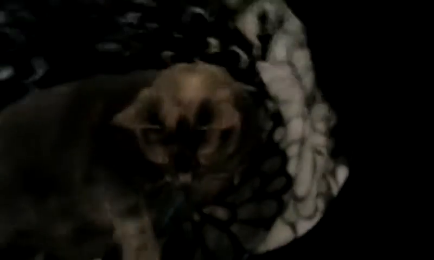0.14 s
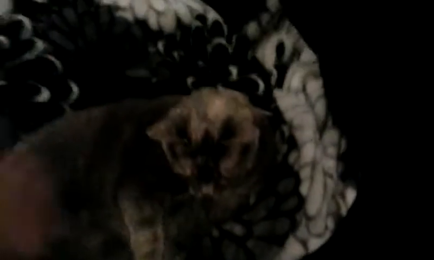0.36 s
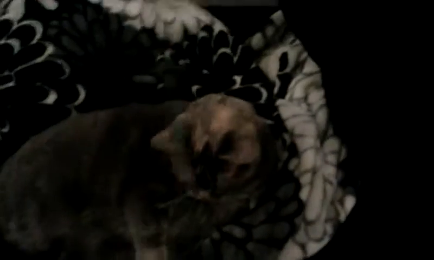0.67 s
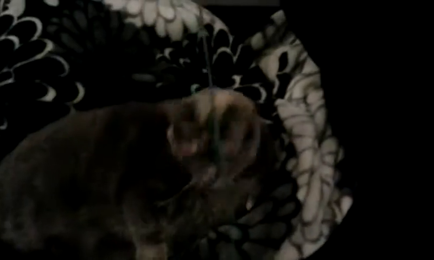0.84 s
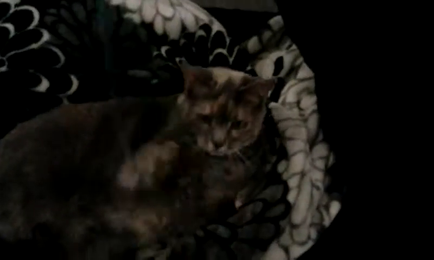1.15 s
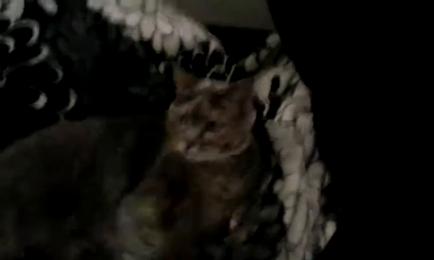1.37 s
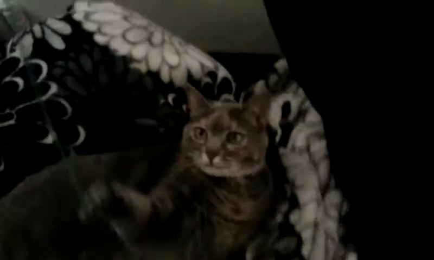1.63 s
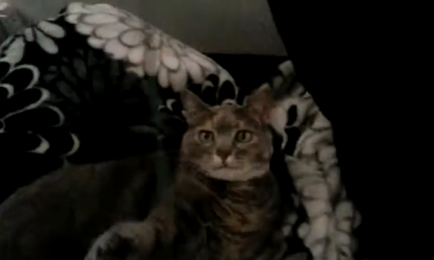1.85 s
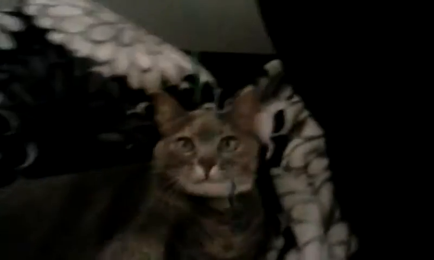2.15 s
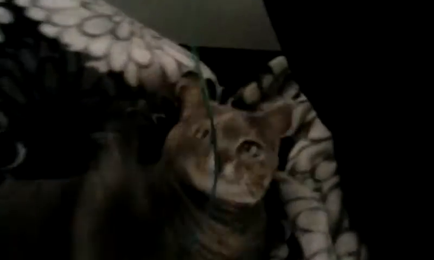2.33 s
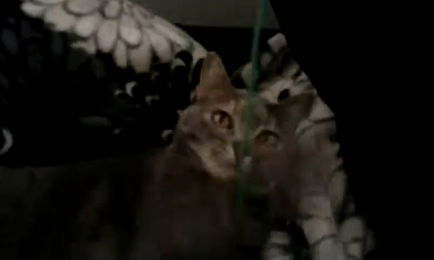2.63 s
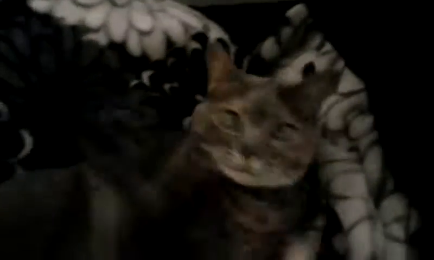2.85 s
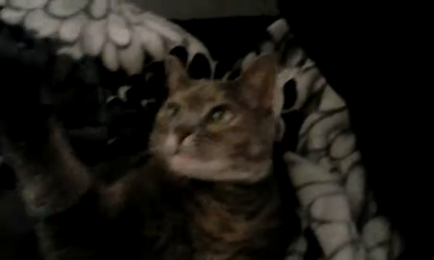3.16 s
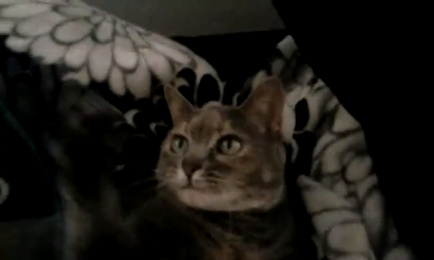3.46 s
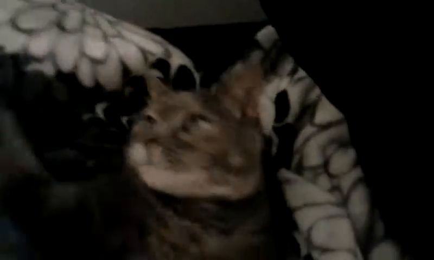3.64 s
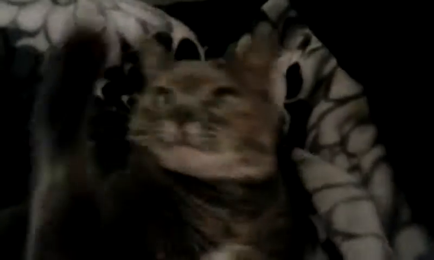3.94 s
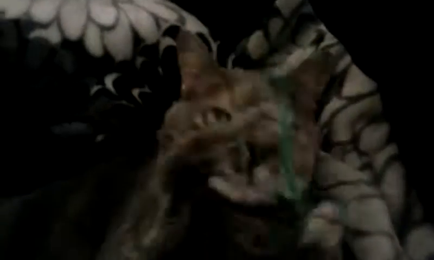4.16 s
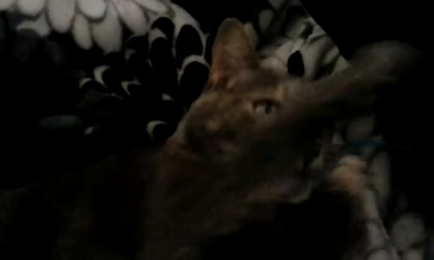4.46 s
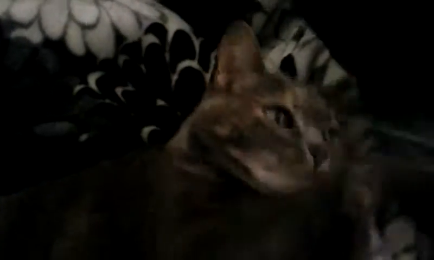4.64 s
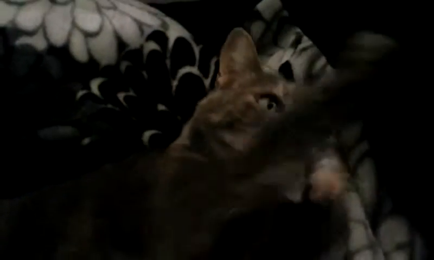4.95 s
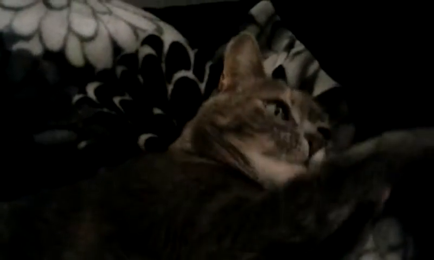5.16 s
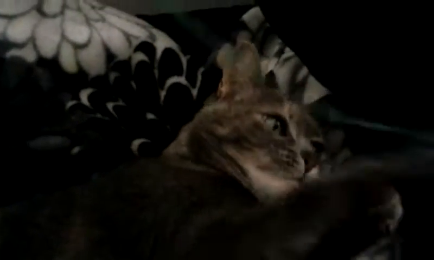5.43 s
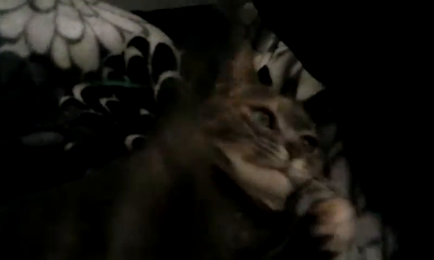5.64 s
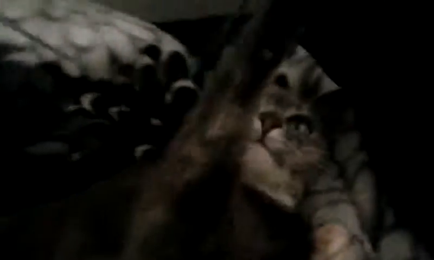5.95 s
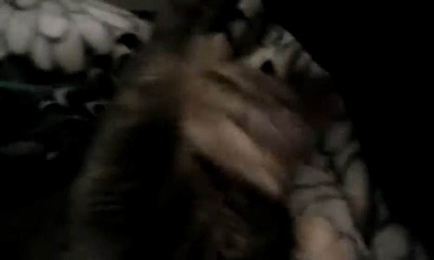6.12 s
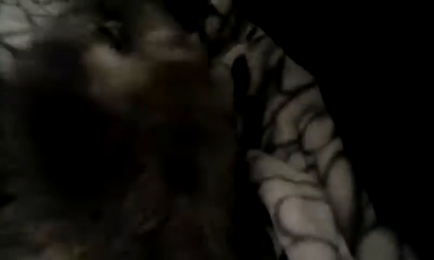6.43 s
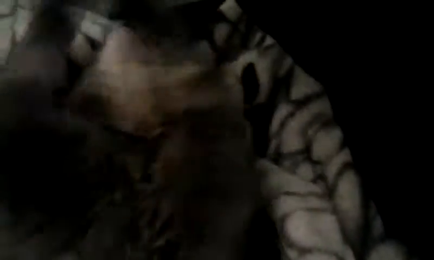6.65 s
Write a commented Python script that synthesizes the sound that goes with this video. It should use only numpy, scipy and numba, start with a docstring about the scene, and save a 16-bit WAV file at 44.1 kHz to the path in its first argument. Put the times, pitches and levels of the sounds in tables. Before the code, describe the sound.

A soft, bright rustle of fur and blanket opens the sound, close to the microphone, and eases after about 0.7 seconds. Low handling rumble and faint room air continue underneath, with everything dipping briefly now and then. From 1.5 to 2.2 seconds the rustle grows again and a cat's claws make a run of sharp, high clicks, with a dull paw thump on the mattress at 1.6 seconds. Softer pats follow around 3 and 4 seconds. From about 3.9 to 5.8 seconds a string slides over the cloth with a thin, uneven hiss, dotted with light ticks, a muffled pat and a clearer click at 5 seconds. Near 5.8 seconds comes a soft thud and a quick cluster of loud claw snaps. Weaker rustling and a tiny tick carry on until about 6.8 seconds.

```python
"""Fur and cloth rustle brightly as a cat on a blanket bats at a string, close to a handheld camera.
Slipping fibres excite the resonance of the microphone port, and the hand's tremor rumbles in the case
over the faint air of a quiet room. Claws tick, paws thud on the mattress, and later the string hisses
as it is drawn over the cloth. Now and then the rustle, rumble and room noise dip for a moment."""
import sys
import numpy as np
from scipy import signal
from scipy.fft import rfft, irfft
from scipy.io import wavfile
from scipy.ndimage import uniform_filter1d
from numba import njit

SR = 44100
rng = np.random.default_rng(int(sys.argv[2]) if len(sys.argv) > 2 else 0)


def pcm_store(signal):
    """Save signal as 16-bit PCM."""
    levels = np.round(np.clip(np.atleast_2d(signal), -1, 1) * 32767)
    wavfile.write(sys.argv[1], SR, levels.astype(np.int16).T)


N = 299439

# Cloth friction. Each row: time in seconds, then levels in dB of port band, top sheen and lower hiss.
RUSTLE_LEVELS = [(0.0, -46.5, -51, -53), (0.09, -50, -56, -57.5), (0.2, -48, -50.5, -52),
                 (0.36, -45, -47, -50), (0.55, -46.5, -52, -58.5), (0.72, -54, -55.5, -75),
                 (.84, -52.5, -52.5, -74), (.95, -56, -55, -81), (1.3, -55, -55, -80),
                 (1.52, -48.5, -54, -68), (1.72, -47, -53, -64), (1.93, -47.5, -65, -76),
                 (2.12, -43, -52, -60.5), (2.3, -47, -60, -67.5), (2.55, -54, -64, -79),
                 (2.76, -52.5, -58.5, -80), (2.785, -47.5, -63, -76), (2.82, -43.5, -53, -66),
                 (2.845, -47.5, -60, -68), (2.865, -51, -62, -73), (2.95, -55, -62, -80),
                 (3.07, -52.5, -64, -78), (3.12, -55.5, -65, -80), (3.2, -53, -62, -74),
                 (3.3, -56, -62.5, -76), (3.62, -57.5, -63.5, -69.5), (3.82, -54, -57.5, -74.5),
                 (4.05, -55, -58, -66.5), (4.4, -56, -60, -75), (4.6, -56, -57.5, -64),
                 (4.85, -56, -58, -75), (5.15, -53.5, -56.5, -74), (5.5, -56.5, -57.5, -72),
                 (5.72, -58.5, -61, -72), (5.84, -49, -53.5, -57.5), (6.1, -59, -64, -84),
                 (6.27, -57, -68, -71), (6.32, -60, -63, -73), (6.35, -56.5, -65, -66),
                 (6.385, -60, -64, -71), (6.405, -54.5, -63, -74), (6.44, -59.5, -69, -82),
                 (6.55, -63, -70, -72.5), (6.635, -60, -68, -78), (6.7, -60, -68, -86),
                 (6.79, -61, -65, -78)]
# The brightest band of the rustle. Each row: time in seconds, centre in Hz.
PORT_CENTRE = [(0, 8300), (.55, 8240), (1.0, 8700), (1.6, 7970), (2.0, 8100), (2.17, 7770), (2.4, 8240),
               (2.76, 8080), (3.0, 8230), (3.84, 8340), (4.4, 8230), (5.7, 8500), (5.82, 8100),
               (5.95, 8540), (6.2, 8760), (6.27, 7700), (6.35, 8450), (6.79, 8460)]
# Narrow ring of cloth dragged hard. Each row: time in seconds, centre in Hz, level in dB.
DRAG_RING = [(0, 7050, -46), (.08, 7040, -52), (.18, 7000, -52.5), (.3, 7060, -45.5), (.36, 6900, -55),
             (.47, 6800, -47.5), (.58, 6840, -57), (.7, 7000, -59), (.8, 7000, -100)]
# Tremor of the handled case. Each row: time in seconds, level in dB.
TREMOR_LEVELS = [(0.0, -62), (0.3, -70), (0.42, -58.5), (0.62, -63.5), (0.95, -73.5), (1.16, -71),
                 (1.23, -60), (1.29, -65), (1.42, -59), (1.54, -63), (1.62, -58), (1.75, -64.5),
                 (1.95, -57.5), (2.15, -62.5), (2.45, -61.5), (2.66, -61), (2.71, -56), (2.95, -65.5),
                 (3.06, -55), (3.12, -65), (3.19, -53.5), (3.25, -58.5), (3.42, -62), (3.52, -59),
                 (3.62, -66.5), (3.9, -57.5), (4.3, -60), (5.0, -56.5), (5.12, -63.5), (5.25, -61),
                 (5.55, -58.5), (5.72, -57), (5.78, -53.5), (5.92, -66), (6.2, -68.5), (6.3, -59.5),
                 (6.38, -56), (6.44, -71), (6.5, -68), (6.79, -68)]
# Firm grips on the case. Each row: start in seconds, hold in seconds, level in dB.
FIRM_GRIPS = [(0.0, 0.23, -75), (0.344, 0.28, -66.5), (1.37, 0.16, -73), (1.556, 0.12, -61.5),
              (2.78, 0.037, -77), (2.994, 0.052, -65), (3.971, 0.15, -63), (4.821, 0.054, -60.5),
              (5.647, 0.18, -61.5), (6.3, 0.054, -73)]
# Murmur of room air. Each row: time in seconds, level in dB.
AIR_LEVELS = [(0.72, -72.5), (0.95, -77), (1.32, -75), (1.6, -64), (1.92, -71.5), (2.2, -67.5),
              (2.7, -72.5), (3.1, -69.5), (3.7, -70.5), (4.0, -67), (4.4, -68.5), (4.8, -66), (5.5, -66),
              (5.77, -65.5), (5.82, -60.5), (5.9, -67), (6.12, -75), (6.3, -68), (6.5, -73.5),
              (6.79, -69.5)]
# Wavering bands in that murmur. Each row: centre in Hz, width in Hz, relative level in dB.
WAVERING_BANDS = [(1385, 460, -4.5), (2275, 540, -6), (2790, 480, -3.5)]
# Claw impacts. Each row: time in seconds, level in dB, ring in Hz, relative level of the edge in dB.
CLAW_TICKS = [(0.6382, -46, 2290, -17), (.639, -52, 3780, -16), (1.5019, -28.5, 8400, -6),
              (1.5075, -28, 9200, -4), (1.535, -29, 8900, -7), (1.5528, -33, 8470, -22),
              (1.5713, -30.5, 8030, -20), (1.5905, -46, 2980, -11), (1.5904, -23.5, 8500, -9),
              (1.6737, -21, 8800, -6), (1.7194, -15, 8530, -6), (2.0308, -21.5, 9300, -6),
              (2.0906, -28, 8400, -28), (2.1548, -11.5, 7630, -16), (2.1544, -13.5, 9700, -11),
              (2.1868, -30, 7300, -23), (2.2071, -28, 7760, -11), (3.5413, -33, 3150, -2),
              (3.5428, -35.5, 4550, -31), (4.232, -42, 7000, -15), (4.2664, -35, 9300, -2),
              (4.4553, -28.5, 6200, -2), (4.545, -34, 8700, -17.5), (4.59, -38, 4950, -11),
              (5.0001, -22, 7800, -9), (5.105, -42, 9500, -8), (5.785, -36, 6860, -25),
              (5.8144, -10, 7900, 1), (5.821, -22, 8300, -1), (5.822, -25, 8100, -3.5),
              (5.8228, -18.5, 8300, -1), (5.856, -36, 8500, -6), (5.858, -47, 2550, -10),
              (5.8604, -23, 8700, 2.5), (5.8645, -36, 7500, -5), (5.8914, -21, 8600, -2),
              (6.2449, -39, 6200, -12), (6.2451, -43, 8550, -16), (6.352, -60, 4800, -19)]
# Brief dips in level. Each row: time of the lowest point in seconds, depth in dB, fall in seconds.
LEVEL_DIPS = [(.975, 10, 0.007), (1.02, 9, .008), (1.056, 16, 0.025), (1.281, 7, 0.012), (1.325, 14, 0.025),
              (1.372, 21, 0.023), (1.409, 11.5, 0.017), (2.539, 11, 0.018), (3.25, 7.5, 0.0089),
              (3.287, 8, 0.024), (3.38, 8, 0.007), (3.442, 13, 0.041), (3.492, 23, 0.027),
              (3.766, 10.5, 0.013), (4.295, 10, 0.019), (4.373, 10.5, 0.017), (4.428, 9, 0.013),
              (5.479, 10.5, 0.0094), (5.602, 11.5, 0.0049), (5.737, 6, 0.011), (6.048, 15, 0.0036),
              (6.225, 20, 0.022), (6.393, 10, 0.0062), (6.437, 6.5, 0.013), (6.608, 18, 0.017),
              (6.701, 7, 0.051), (6.746, 16, 0.018)]
# Paw impacts. Each row: start in seconds, level in dB, ring in Hz, rise in seconds,
# relative level of the knock in dB, snap in Hz, rise of the snap in seconds.
PAW_THUDS = [(1.59, -21.5, 144, 0.002, -26, 1580, 0.0003), (1.6431, -30, 150, 0.0033, -30, 1370, .0005),
             (2.988, -50, 174, 0.0036, -37, 900, .0008), (3.026, -42.5, 166, 0.0021, -22, 1200, 0.0013),
             (3.051, -56, 159, 0.0046, -22, 1190, 0.0041), (3.08, -47, 172, 0.0038, -35, 900, 0.00091),
             (3.985, -42, 136, 0.0067, -43, 900, .0008), (4.049, -51, 168.7, 0.017, -29, 900, .0008),
             (4.84, -47.5, 143, 0.008, -20, 546, 0.0011), (5.757, -42.5, 112.5, 0.011, -42, 900, .0008)]
# String drawn over cloth. Each row: time in seconds, then levels in dB of the low and the high band.
STRING_LEVELS = [(3.895, -100, -100), (3.912, -62, -52), (3.96, -61, -56), (3.975, -79, -63),
                 (3.99, -62, -55), (4.12, -59.5, -56), (4.25, -61, -52.5), (4.35, -61.5, -55),
                 (4.38, -75, -63), (4.44, -73, -56), (4.465, -59, -54.5), (4.5, -78, -54), (4.57, -79, -60),
                 (4.6, -67, -60), (4.7, -59, -51), (4.82, -64.5, -54.5), (4.88, -67.5, -54),
                 (4.95, -61.5, -53), (5.1, -60.5, -51), (5.22, -64, -55), (5.33, -62, -53.5),
                 (5.43, -65.5, -56), (5.55, -69, -57), (5.68, -66.5, -58.5), (5.78, -67, -71),
                 (5.83, -100, -100)]

# Spectra of the noises. Each row: frequency in Hz, relative spectral density in dB.
SHEEN_SPECTRUM = [(5880, -16), (10000, -13), (11000, -12.5), (11900, -2), (12700, -4.5), (14100, -9),
                  (15100, -8), (15900, -13.5)]
TREMOR_SPECTRUM = [(12, -46), (22, -43), (33, -15.5), (57, -3.5), (107, 2.5), (161, -8.5), (234, -26),
                   (259, -52), (300, -28), (390, -79), (660, -120)]
GRIP_SPECTRUM = [(100, -35), (170, -0.5), (220, -5.5), (290, -21), (441, -16.5), (492, -22.5), (605, -24),
                 (800, -33), (1040, -66), (1760, -120)]
AIR_SPECTRUM = [(150, -18), (250, -8), (334, -21), (447, -29), (678, -16), (807, -32), (938, -25),
                (1180, -8), (1420, -1.5), (2210, -3), (2890, -8.5), (3650, -5.5), (4000, -9.5), (5200, -66),
                (8800, -120)]
HUSH_SPECTRUM = [(200, -20), (330, -0.5), (520, -4.5), (800, -4.5), (1100, -1), (1600, -38)]
HISS_SPECTRUM = [(2500, -40), (3500, -14), (5500, -13.5), (7000, -0.5), (8500, -14), (10500, -7.5),
                 (13000, -5), (15700, -12.5), (16000, -43)]

RUSTLE_LOWPASS_HZ, CAMERA_TOP_HZ = 15950, 16990
TIME = np.arange(N) / SR


def undb(db):
    """Amplitude grows tenfold for every 20 dB."""
    return 10 ** (np.asarray(db) / 20)


def unit(x):
    """Normalisation to an rms of 1."""
    return x / np.sqrt(np.mean(x ** 2))


def curves(table):
    """Linear interpolation in time gives one curve for each column after the first."""
    times, *columns = np.transpose(table)
    return [np.interp(TIME, times, column) for column in columns]


def butter(x, order, hz, kind):
    """A Butterworth filter has a maximally flat passband."""
    return signal.sosfilt(signal.butter(order, hz, kind, fs=SR, output="sos"), x)


def cut_top(x, hz, order=10, ripple_db=.2, stop_db=60):
    """An elliptic low-pass trades ripple for a steep edge."""
    return signal.sosfilt(signal.ellip(order, ripple_db, stop_db, hz, fs=SR, output="sos"), x)


@njit
def resonator(x, hz, width_hz):
    """Two integrators in a loop form a band-pass with gain 1 at its moving centre."""
    y, band_state, low_state = np.empty(len(x)), 0., 0.
    for i in range(len(x)):
        gain, damping = np.tan(np.pi * hz[i] / SR), width_hz / hz[i]
        swing = (band_state + gain * (x[i] - low_state)) / (1 + gain * (gain + damping))
        band_state = 2 * swing - band_state
        low_state += 2 * gain * swing
        y[i] = damping * swing
    return y


def band(x, hz, width_hz):
    """Two resonators in cascade steepen the skirts of a band; rms 1."""
    hz, width_hz = hz * np.ones(N), float(width_hz)
    return unit(resonator(resonator(x, hz, width_hz), hz, width_hz))


def coloured(x, spectrum):
    """Weighting each frequency imposes a spectrum on x; rms 1."""
    hz, db = np.transpose(spectrum)
    bin_hz = np.arange(N // 2 + 1) * SR / N + 1
    gain = undb(np.interp(np.log(bin_hz), np.log(hz), db, -60, -60))
    return unit(irfft(rfft(x) * gain, N))


def wander(per_s):
    """Random steps, smoothed twice, make a slow modulation."""
    hold = int(SR / per_s)
    steps = np.repeat(rng.standard_normal(N // hold + 1), hold)
    return uniform_filter1d(uniform_filter1d(steps, hold), hold)[:N]


def friction(per_s, scatter_db, bed):
    """Stick-slip friction: random impulses of uneven size over an even bed of noise."""
    size = undb(scatter_db * np.minimum(rng.exponential(size=N), 5.))
    slips = (rng.random(N) < per_s / SR) * rng.standard_normal(N) * size
    return unit(slips) + bed * rng.standard_normal(N)


def burst(hz, rise_s, length=500):
    """A damped oscillation whose envelope grows to 1 at rise_s and then decays."""
    t = np.arange(length) / SR
    return np.sin(2 * np.pi * hz * t) * t / rise_s * np.exp(1 - t / rise_s)


def add(out, start_s, sound):
    """Superposition: a sound adds to what is already there."""
    i = int(start_s * SR)
    out[i:i + len(sound)] += sound[:N - i]


def cloth_rustle():
    """Forced resonance: fibre slips drive the microphone port, with a sheen above and a hiss below."""
    port_db, sheen_db, hiss_db = curves(RUSTLE_LEVELS)
    drag_hz, drag_db = curves(DRAG_RING)
    flutter = undb(0.69 * wander(30))
    slips, fine, hard = (friction(per_s=4000, scatter_db=1.3, bed=1.2) * flutter for _ in range(3))
    port = band(slips, curves(PORT_CENTRE)[0], width_hz=3400)
    port = unit(butter(port, 4, 6300, "high"))  # the port passes little below its resonance
    hiss = undb(hiss_db) * band(rng.standard_normal(N), 5000, width_hz=2500) * flutter
    sheen = undb(sheen_db) * coloured(fine, SHEEN_SPECTRUM)
    drag = undb(drag_db) * band(hard, drag_hz, width_hz=1100)
    return cut_top(undb(port_db + 1.66 * wander(45)) * port + sheen + hiss + drag, RUSTLE_LOWPASS_HZ)


def fibre_crackle(per_s=77, scatter_db=3.5, above_rustle_db=4):
    """Shot noise: fibres snap at independent moments, with a strength that follows the rustle."""
    snaps = (rng.random(N) < per_s / SR) * undb(scatter_db * np.minimum(rng.exponential(size=N), 3.))
    snaps *= undb(curves(RUSTLE_LEVELS)[0] + above_rustle_db)
    crackle = np.convolve(snaps, burst(10500, rise_s=.00006))[:N]
    return cut_top(butter(crackle, 4, 6000, "high"), RUSTLE_LOWPASS_HZ)


def case_rumble(attack_s=0.0042, release_s=0.066, loose_grip_db=-22):
    """Structure-borne sound: the hand's tremor shakes the case; firm grips add a higher, lumpy rumble."""
    tremor_gain = undb(curves(TREMOR_LEVELS)[0])
    tremor = coloured(rng.standard_normal(N), TREMOR_SPECTRUM) * undb(2.55 * wander(22))
    grip = coloured(friction(per_s=150, scatter_db=1.0, bed=1.5), GRIP_SPECTRUM)
    grip_gain = tremor_gain * undb(loose_grip_db)
    for start, hold, db in FIRM_GRIPS:
        before, after = np.maximum(start - TIME, 0), np.maximum(TIME - start - hold, 0)
        grip_gain += undb(db) * np.exp(-before / attack_s - after / release_s)
    return tremor_gain * tremor + grip_gain * grip


def room_air():
    """Modulated noise: a faint midrange murmur carries bands that drift in pitch and level."""
    flicker_db = 1.2 * wander(40)
    air = coloured(rng.standard_normal(N), AIR_SPECTRUM)
    for hz, width_hz, db in WAVERING_BANDS:
        gain = undb(db + 4.0 * wander(20))
        air += gain * band(rng.standard_normal(N), hz * (1 + .06 * wander(11)), width_hz)
    return undb(curves(AIR_LEVELS)[0] + flicker_db) * unit(air)


def hush(level_db=-84.5):
    """Stationary noise lays a faint floor in the low mids."""
    return undb(level_db) * coloured(rng.standard_normal(N), HUSH_SPECTRUM)


def microphone_hiss(level_db=-79.5):
    """Self-noise: the microphone adds a steady hiss of its own."""
    return undb(level_db) * coloured(rng.standard_normal(N), HISS_SPECTRUM)


def claw_ticks(tail_db=-14.5, tail_s=0.0023):
    """Impact excitation: a claw tip gives a short ring, a sharp edge, a scratchy tail and a dull body."""
    out, t = np.zeros(N), np.arange(500) / SR
    for time, db, hz, edge_db in CLAW_TICKS:
        rise_s = (0.6 - 0.0525 * edge_db) / hz  # a sharper edge rises in fewer cycles
        edge = undb(edge_db) * burst(12100, rise_s=.00004)
        scratch = butter(rng.standard_normal(len(t)), 1, [.7 * hz, 1.3 * hz], "band")
        tail = undb(tail_db) * scratch * np.exp(-t / tail_s)
        # The tip is too small to radiate lows.
        tip = butter(burst(hz, rise_s) + edge + tail, 6, 0.64 * hz, "high")
        body = undb(-42) * burst(3880, rise_s=0.002) + undb(edge_db - 22.5) * burst(3360, rise_s=0.00015)
        add(out, time - rise_s, undb(db) * (tip + body))
    return cut_top(out, 16300, order=6, ripple_db=.3, stop_db=22)


def level_dips(return_share=0.56):
    """Amplitude modulation, in dB: each dip is a lopsided Gaussian that returns faster than it falls."""
    dip_db = np.zeros(N)
    for time, depth_db, fall_s in LEVEL_DIPS:
        width_s = np.where(TIME < time, fall_s, return_share * fall_s)
        dip_db -= depth_db * np.exp(-((TIME - time) / width_s) ** 2)
    return dip_db


def paw_thuds(length=4000):
    """Damped vibration: a soft paw pushes the mattress into low swings, an overtone and a short knock."""
    out = np.zeros(N)
    for start, db, hz, rise_s, knock_db, snap_hz, snap_rise_s in PAW_THUDS:
        swings = burst(hz, rise_s, length) + undb(-19) * burst(1.8 * hz, 0.0046, length)
        knock = burst(395, 0.0051, length) + undb(13) * burst(snap_hz, snap_rise_s, length)
        add(out, start, -undb(db) * (swings + undb(knock_db) * knock))
    return out


def drawn_string():
    """Friction noise: string on cloth gives a narrow hiss and a broader one near twice its pitch."""
    hz = 4662 + np.interp(TIME, [5.46, 6.1], [0, 260])  # the last pull climbs in pitch
    hz *= 1 + 0.016 * wander(7.6)
    low_noise, high_noise = rng.standard_normal((2, N)) * undb(1.5 * wander(33))
    low_db, high_db = curves(STRING_LEVELS)
    low = undb(low_db) * band(low_noise, hz, width_hz=480)
    high = undb(high_db) * band(high_noise, 1.935 * hz, width_hz=830)
    return low + high


def scene():
    """The sources superpose in one channel; the dips spare the microphone hiss and the impacts."""
    dip_db = level_dips()
    rubbing = cloth_rustle() + drawn_string() + fibre_crackle()
    rubbing *= undb(0.5 * wander(22))  # small quick surges
    contact = (rubbing + case_rumble()) * undb(dip_db)
    ambience = (room_air() + hush()) * undb(0.57 * dip_db)  # the room dips less deeply
    return (contact + ambience + microphone_hiss() + claw_ticks() + paw_thuds())[None]


def record(dry):
    """Band limiting: the camera drops the deepest bass and cuts the top."""
    return cut_top(butter(dry, 4, 50, "high"), CAMERA_TOP_HZ, stop_db=70)


dry = scene()
out = record(dry)
pcm_store(out)
```